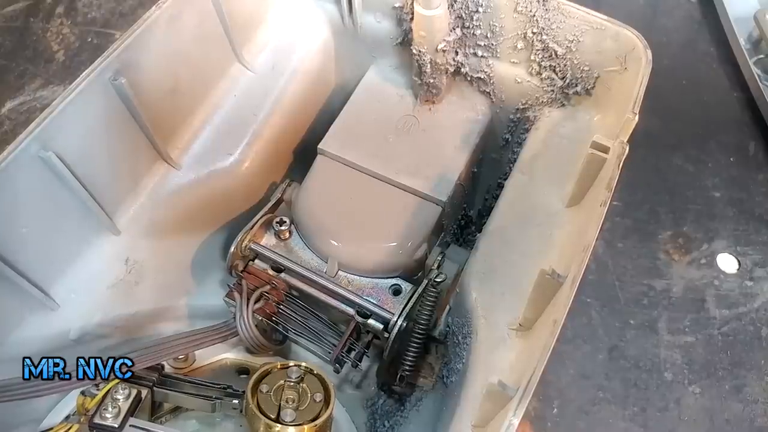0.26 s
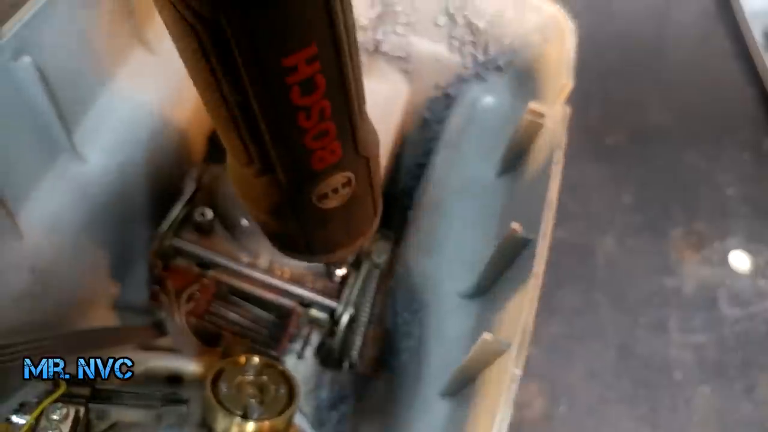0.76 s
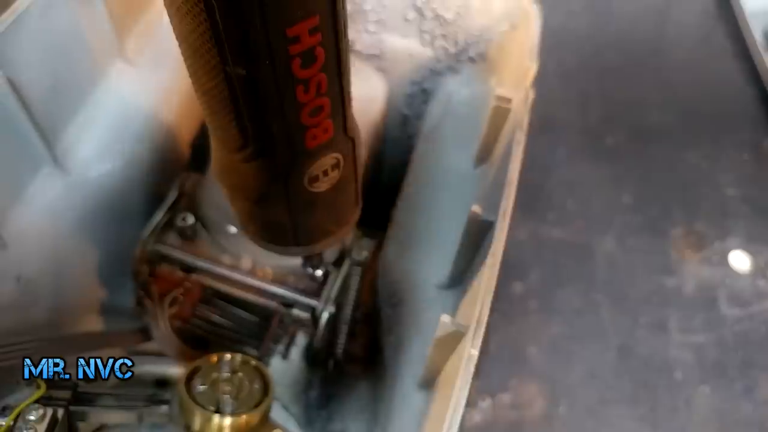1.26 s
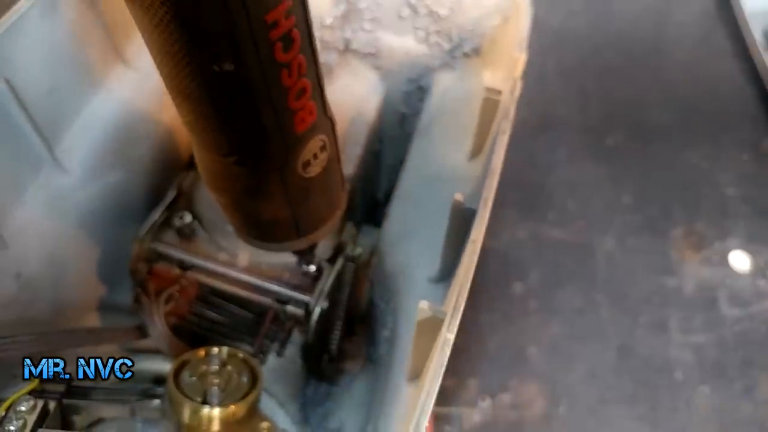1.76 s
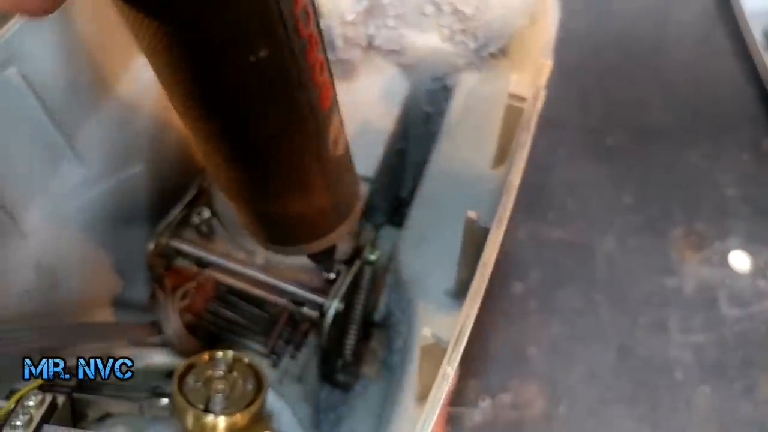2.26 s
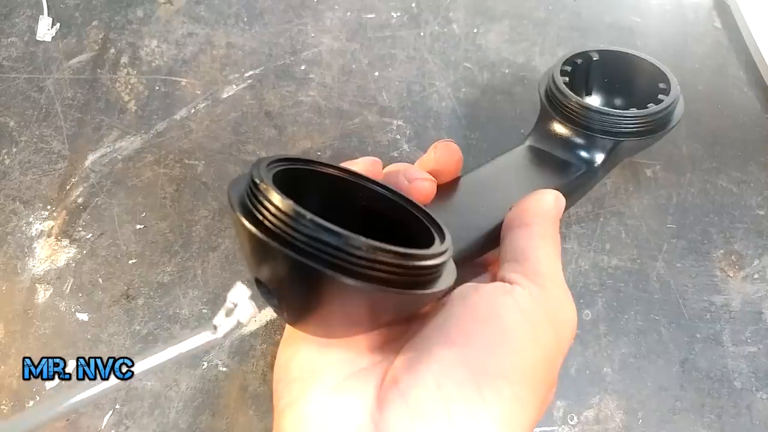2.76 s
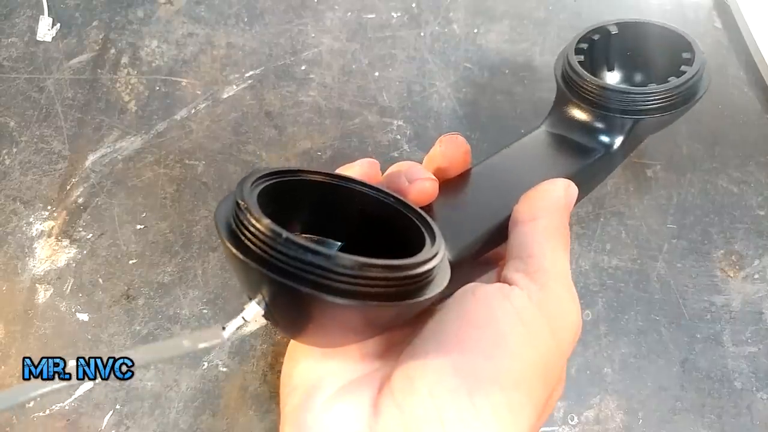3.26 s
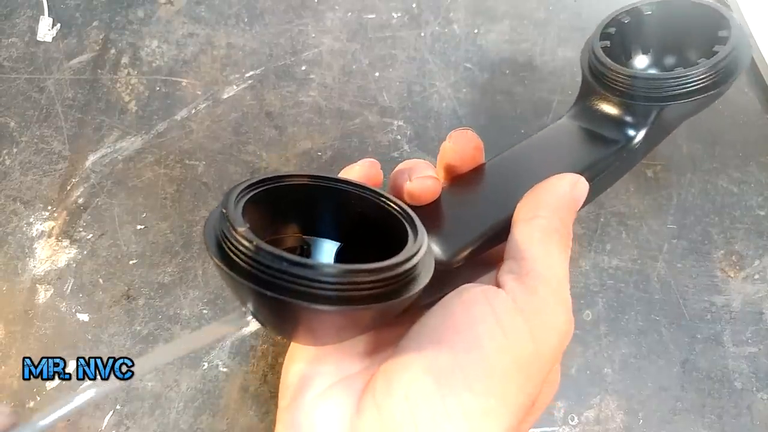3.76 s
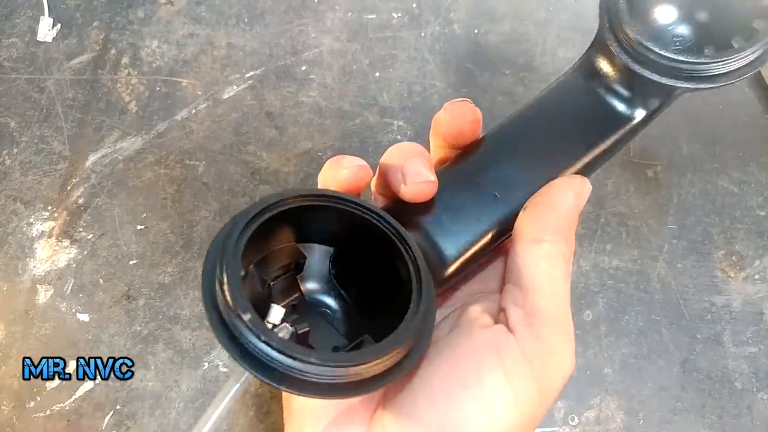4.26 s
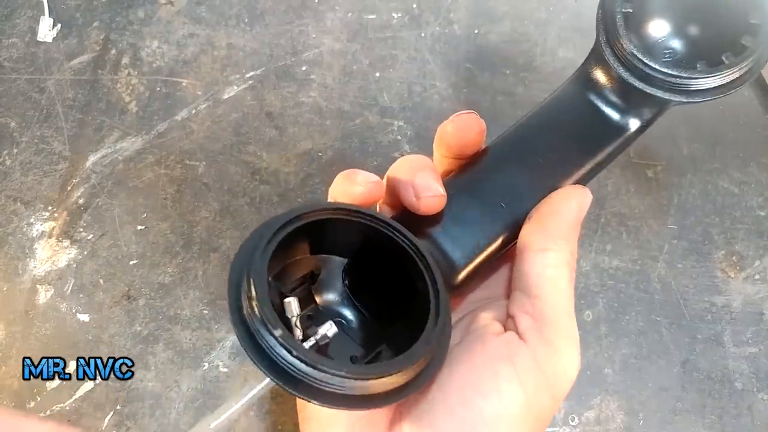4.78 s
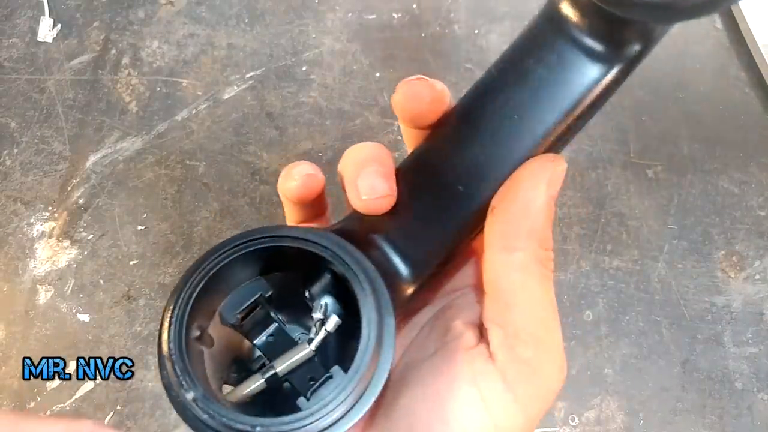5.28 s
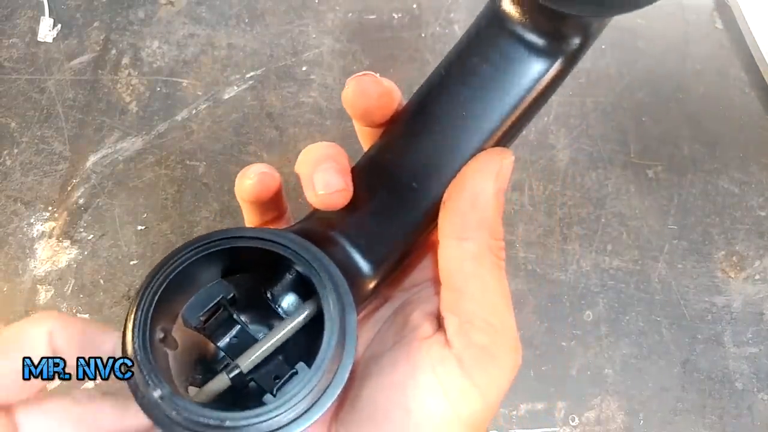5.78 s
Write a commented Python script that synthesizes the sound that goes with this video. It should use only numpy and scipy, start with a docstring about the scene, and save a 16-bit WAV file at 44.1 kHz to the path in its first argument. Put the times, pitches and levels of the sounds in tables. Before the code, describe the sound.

Light metallic taps, then a small cordless screwdriver clacks and whirs harshly for a second, stops with a click; afterwards small terminals tick in a plastic cup.

```python
"""Cordless screwdriver on an old telephone

A workbench in a small humming workshop, everything close to the microphone. The bit taps the screw head.
The motor spins up, the spindle lock clacks, the gears whir for a second and coast to a click.
Then a cord is drawn through the handset, its metal terminals ticking against the plastic cup.
Gears are sine tones; knocks, rattle and hiss are shaped noise through filters; an opening drone fades out.
"""
import sys
import numpy as np
from scipy import signal
from scipy.fft import rfft, irfft
from scipy.io import wavfile
from scipy.ndimage import uniform_filter1d

SR = 44100
rng = np.random.default_rng(int(sys.argv[2]) if len(sys.argv) > 2 else 0)


def generate_wav(signal):
    """Clip the signal to [-1, 1] and save it as 16-bit WAV at the path in sys.argv[1]."""
    frames = np.transpose(np.atleast_2d(signal))
    scaled = np.clip(frames, -1, 1) * 32767
    pcm = np.round(scaled).astype(np.int16)
    wavfile.write(sys.argv[1], SR, pcm)


N = 265923
T = np.arange(N) / SR  # s

# the trigger is pressed, let go, the shaft stands still (s)
START_S, RELEASE_S, STOP_S = 1.355, 2.3, 2.576
BRAKING_S = 2.38  # middle of the braking
ROOM_T60_S = 0.384


def screwdriver(flutter=0.0015):
    """Planet gears whine, their teeth rattle the housing, the brushes hiss; the room answers."""
    hz = shaft_rate()
    turns = np.cumsum(hz * (1 + flutter * walk(60))) / SR
    running = np.clip((STOP_S - T) / 0.01, 0, 1)
    full_speed = np.clip((hz / 300) ** 2, 0, 1)  # the whine only stands out near full speed

    whine = gear_whine(turns, hz) * full_speed
    whine = whine * loudness(-28.5, power=5, growth_db=4.5, fade_s=2.2, fade_db=44)

    rattle = tooth_rattle(turns) * loudness(-27.5, power=1.7, growth_db=2.5, fade_s=2.43, fade_db=190)
    rattle = rattle * undb(-7.5 * swell(2.325, 0.055))  # the teeth unload and rattle less

    hiss = brush_hiss() * loudness(-27, power=3, growth_db=5.3, fade_s=2.425, fade_db=240)
    hiss = hiss * undb(4 * swell(BRAKING_S, 0.05))  # the hiss swells under braking

    # the whine is kept drier, so its tones stay steady
    steady = room(running * whine, -17, ROOM_T60_S)
    return steady + room(running * (rattle + hiss), -9.5, ROOM_T60_S)


def shaft_rate():
    """Motor turns per second: spin-up, sag under load, a swing with each turn of the screw, then coasting."""
    full_hz, sag_hz_per_s, coast_hz_per_s = 325.23, 28, 300
    screw_hz, swing_hz, easy_s = 5.4, 2.4, 1.91  # the load eases once a turn; easy_s is one such moment
    swing = swing_hz * np.cos(2 * np.pi * screw_hz * (T - easy_s))
    driven = full_hz - sag_hz_per_s * (T - START_S) + swing
    coasting = coast_hz_per_s * np.maximum(T - RELEASE_S, 0)
    return np.maximum(spin_up() * driven - coasting, 0)


def spin_up(time_s=0.04):
    """Share of full speed reached since the trigger was pressed, an exponential approach."""
    return 1 - np.exp(-np.maximum(T - START_S, 0) / time_s)


def loudness(db, power, growth_db, fade_s, fade_db):
    """A voice rises with the motor, grows (dB/s) as the screw backs out, and from fade_s falls (dB/s)."""
    drift_db = growth_db * (T - START_S) - fade_db * np.maximum(T - fade_s, 0)
    return spin_up() ** power * undb(db + drift_db)


# gear whine: multiple of the shaft rate, level/dB; the third and sixth are by far the strongest
GEAR_TONES = [(1, -19), (3, 1.5), (4, -17), (5, -10), (6, 0.5), (7, -15), (7.5, -19), (8, -14), (9, -20),
              (10, -13.5), (12, -24)]
# sharp housing resonances that light up a mesh tone gliding through: f/Hz, width/Hz, level/dB
SINGING_MODES = [(920, 40, -9), (2200, 52, 7), (2740, 32, 15), (3025, 30, 2)]


def gear_whine(turns, hz, waver_db=1.71):
    """Mesh tones locked to the shaft, clean at speed and broken up when the teeth go slack."""
    slack = np.clip((300 - hz) / 30, 0, 1)  # 0 above 300 turns/s, 1 below 270
    out = 0
    for multiple, db in GEAR_TONES:
        phase = 2 * np.pi * (multiple * turns + rng.random())
        size = undb(db + waver_db * walk(24.92))
        stumble = slack * walk(170)
        broken = 1 + slack * walk(60)
        out = out + size * broken * np.sin(phase + stumble)
    return (out + ring(out, SINGING_MODES)) / (1 + slack)


# gearbox housing: f/Hz, width/Hz, level/dB
HOUSING_MODES = [(245, 25, -23.5), (756.4, 27.3, 0.5), (898.3, 104.2, 1), (1243, 219, -7.5),
                 (1623, 159, 4.5), (1890, 245, -7), (2268.6, 88.8, 4), (2450, 175, -46), (2850, 160, -31)]


def tooth_rattle(turns, repeat=0.4984, gate_depth=0.443):
    """Teeth knock the housing; the same flaws come round again every fourth turn."""
    flaws = rng.standard_normal(512)[(turns * 128).astype(int) % 512]  # 128 flaws a turn
    teeth = repeat * flaws + (1 - repeat) * rng.standard_normal(N)
    mesh = 1 + gate_depth * np.cos(2 * np.pi * 3 * turns)  # three swells in each turn
    uneven = undb(1.2 * walk(600))
    rattle = ring(teeth * mesh * uneven, HOUSING_MODES)
    # the upper housing resonance swells while the loosened screw runs freely
    rattle = rattle + swell(1.906, 0.22) * resonate(rattle, 2490, 586)
    body = [(240, 5.0), (450, -13), (640, -12), (730, 1), (2700, -1), (3600, -6), (10000, -20.5)]
    return unit(colour(rattle, body))


# brushes and sliding teeth: f/Hz, level/dB per Hz
BRUSH_COLOUR = [(300, -19.5), (1500, -12), (3000, -7), (3600, -6.5), (4400, -5), (5300, -2.5), (6400, -7.5),
                (7800, -1), (9200, -1), (10800, -0.5), (12000, -6), (13500, -15), (14200, -12.5),
                (16000, -19)]


def brush_hiss(grit_db=2, bright_share=0.377, brake_share=0.775, gather_s=0.13):
    """Gritty noise that gathers into a brighter hiss centred near 9.4 kHz as the motor brakes."""
    hiss = colour(rng.standard_normal(N) * undb(grit_db * walk(900)), BRUSH_COLOUR)
    braking = bright_share + brake_share * swell(BRAKING_S, gather_s)
    bright = resonate(resonate(rng.standard_normal(N), 9480, 2600), 9400, 2500)
    return (unit(hiss) + braking * unit(bright)) / np.hypot(1, braking)


# spindle lock: t/s, level/dB, rise/s, fall/s, tilt/dB per octave, strongest ring f/Hz,
# housing thud level/dB relative to the snap
LOCK_CLACKS = [(1.399, -25, 0.0018, 0.0032, 5.5, 8300, -11.5), (1.442, -17.5, 0.00033, 0.0025, 3, 5000, -1),
               (1.4438, -11, 0.00078, 0.00466, 2.5, 1720, -9),
               (1.46, -18.5, 0.00356, 0.0095, -0.5, 1600, -0.5),
               (2.5697, -30, 0.0003, 0.0087, 1, 8300, -2.5),
               (2.5789, -19, 0.000165, 0.00172, -2, 3390, -12)]
# steel of the lock: f/Hz, level/dB per Hz
LOCK_COLOUR = [(150, -4.5), (240, 8.5), (340, -13), (480, -4.5), (900, -3.5), (1700, 11.5), (2500, 3.5),
               (4200, 4.5), (5500, 6.5), (6600, -1.5), (8400, 9), (10500, -4), (16000, -28)]
# the driver's body and the bench under it: t/s, level/dB, f/Hz, width/Hz
BODY_THUMPS = [(1.446, -19, 254, 21.2), (1.446, -26, 486, 69.5), (1.446, -23, 762, 58.3),
               (2.484, -26, 757.2, 45), (2.578, -31, 887, 109.5)]


def spindle_lock(wet_db=-9):
    """Steel rollers snap in and out of their wedge, shake the housing and jolt the whole tool."""
    out = np.zeros(N)
    for s, db, rise, fall, tilt_db, hz, thud_db in LOCK_CLACKS:
        snap = colour(contact(rise, fall, tilt_db, wet_db), LOCK_COLOUR)
        add(out, s, snap + resonate(snap, hz, hz / 2), db)
        thud = ring(contact(rise, fall, 0, wet_db), HOUSING_MODES)
        add(out, s, thud, db + thud_db)
    for s, db, hz, width in BODY_THUMPS:
        jolt = resonate(signal.unit_impulse(SR // 4), hz, width)
        add(out, s, resonate(jolt, hz, hz / 2), db)
    return out


# the bit feels for the screw head: t/s, level/dB
BIT_TAPS = [(.660, -39.5), (.696, -38.5), (0.759, -38.5), (0.8642, -35.5)]
# the ringer's steel frame: f/Hz, width/Hz, level/dB
FRAME_MODES = [(737, 92, 13), (1610, 173, 14), (2360, 330, 7.5), (3140, 206, -4), (4360, 320, -16),
               (5440, 580, -3), (8500, 630, -24.5)]


def taps(crack_db=-19, wet_db=-10):
    """The bit taps the screw and rings the frame, with a little bare crack."""
    out = np.zeros(N)
    for s, db in BIT_TAPS:
        force = contact(0.000244, 0.00284, 0, wet_db)
        add(out, s, ring(force, FRAME_MODES) + undb(crack_db) * force, db)
    return out


# cord terminals against the cup: t/s, level/dB, skid before the knock/s, tilt/dB per octave,
# the terminal's own ring f/Hz
TERMINAL_TICKS = [(3.8924, -40.5, 0.00043, -3.5, 6340), (4.5209, -42.5, 0.00027, 3.5, 8400),
                  (4.539, -38, 0.003, 0, 8440), (4.552, -34, .0055, 1, 7850),
                  (4.584, -38.5, 0.002, 2, 8420), (4.646, -46, 0.00023, 2.5, 8680),
                  (5.0385, -26, 0.00458, 0, 5990), (5.16, -34.5, 0.00636, 2, 6000),
                  (5.2674, -27.5, 0.0002, 4, 4620), (5.8523, -24, 0.00016, 1.5, 8750),
                  (5.9165, -31, 0.00024, -1, 4720)]
# terminals and cup, heavily damped by the hand: f/Hz, level/dB per Hz
CUP_COLOUR = [(500, -18.5), (1300, -11), (2300, -3), (2900, -8), (3500, -1.5), (4200, -10), (4800, -3.5),
              (5900, 2), (6500, -4.5), (7300, 5), (8800, 5), (10500, 0), (12000, -15.5), (16000, -25)]
# the metal terminals on the cord's end: f/Hz, width/Hz, level/dB
TERMINAL_MODES = [(5400, 160, 4), (7650, 200, 0), (8400, 130, 3), (11200, 250, 5)]


def ticks(ring_db=1, ring_width=700, wet_db=-7.5, metal_db=-7, crack_db=-16, hard_db=-25):
    """Terminals knock and skid in the cup, each ringing briefly; the harder the knock, the more bare crack."""
    fall_s, skid_linger = 0.00241, 0.49  # a knock dies away this fast, plus a share of its skid
    out = np.zeros(N)
    for s, db, skid, tilt_db, hz in TERMINAL_TICKS:
        knock = colour(contact(skid, fall_s + skid_linger * skid, tilt_db, wet_db), CUP_COLOUR)
        own_ring = undb(ring_db) * resonate(knock, hz, ring_width)
        metal = undb(metal_db) * ring(knock, TERMINAL_MODES)
        add(out, s, knock + own_ring + metal, db)
        crack = contact(skid, fall_s / 2, 0, 2 * wet_db)
        add(out, s, crack, db + crack_db + (db - hard_db))
    return out


# pulls on the cord, which rubs along the cup: middle t/s, half length/s, level/dB, catches per s (wavering)
CORD_PULLS = [(3.085, 0.04, -60, 69.5), (3.683, 0.109, -60, 44.4), (4.586, 0.0475, -46.5, 900)]


def cord(metal_db=-3):
    """The cord catches and slips on the cup: faint single ticks when slow, a jingling rasp when pulled fast."""
    fall_s, scatter_db, tilt_db = 0.00068, 1, 3  # each catch: decay, spread of level, tilt per octave
    out = np.zeros(N)
    for s, half, db, rate in CORD_PULLS:
        caught = np.cumsum(rate * undb(4 * walk(50))) / SR + rng.random()
        slips = np.diff(np.floor(caught), prepend=0) > 0
        strengths = slips * undb(scatter_db * rng.standard_normal(N))
        grip = signal.lfilter([1], [1, -np.exp(-1 / (fall_s * SR))], strengths)
        out += unit(grip) * swell(s, half) * undb(db)
    brighter = [(hz, db + tilt_db * np.log2(hz)) for hz, db in CUP_COLOUR]
    rasp = out * unit(colour(rng.standard_normal(N), brighter))
    return rasp + undb(metal_db) * ring(rasp, TERMINAL_MODES)


# workshop air: f/Hz, level/dB per Hz
AIR_COLOUR = [(20, -16), (110, 0.5), (200, 4.5), (330, 0.5), (600, -2), (1000, -4), (1700, -8), (2300, -13),
              (4000, -18), (6500, -21.5), (8700, -17.5), (10500, -27), (13000, -29), (16000, -30)]
# low room resonances: f/Hz, width/Hz, level/dB rms
ROOM_RUMBLE = [(44.63, 4.45, -46), (54.54, 8.54, -41), (74.06, 17.2, -48), (140.54, 13.8, -52.5)]
# mains hum: f/Hz, level/dB rms before the waver
MAINS_HUM = [(100, -42.5), (200, -58)]
# background hiss of the opening: f/Hz, width/Hz, level/dB rms before the fade
OPENING_HISS = [(441, 800, -49), (2350, 720, -59.5), (5286, 450, -59.5), (7690, 3470, -58)]
# low hum tones of the opening: f/Hz, level/dB rms before the waver and fade
OPENING_HUM = [(68, -43.5), (143, -45.5), (173, -43.5)]


def workshop():
    """Filtered-noise air, low rumble, mains hum, and an opening drone that fades out."""
    air = unit(colour(rng.standard_normal(N), AIR_COLOUR)) * undb(-45 + 0.5 * walk(6.2))
    fade = np.clip((0.742 - T) / 0.317, 0, 1)  # silent from 0.742 s
    drone = (narrow_noises(OPENING_HISS) + tones(OPENING_HUM)) * fade
    return air + narrow_noises(ROOM_RUMBLE) + tones(MAINS_HUM) + drone


def narrow_noises(rows):
    """Noise held in (Hz, width, dB) resonances; the narrower, the more like a wavering tone."""
    out = 0
    for hz, width, db in rows:
        held = resonate(resonate(rng.standard_normal(N), hz, width), hz, width)
        out = out + undb(db) * unit(held)
    return out


def tones(rows, waver_db=2.6):
    """Steady (Hz, dB rms) hum lines that waver a little in level."""
    out = 0
    for hz, db in rows:
        size = np.sqrt(2) * undb(db + waver_db * walk(4.4))
        out = out + size * np.sin(2 * np.pi * (hz * T + rng.random()))
    return out


def room(x, wet_db, t60, gap_s=0.0019):
    """Bench and near walls answer with a short dense tail of decaying noise."""
    t = T[:SR // 2]
    decay = np.exp(-np.log(1000) * t / t60)
    tail = rng.standard_normal(len(t)) * decay * np.clip(t / gap_s - 1, 0, 1)
    tail = tail / np.sqrt(np.sum(tail ** 2))
    tail = colour(tail, [(200, 6), (2000, 2.0), (9000, -0.5), (15000, -16)])
    return x + undb(wet_db) * signal.fftconvolve(x, tail)[:N]


def contact(rise, fall, tilt_db, wet_db, wash_t60_s=0.2555):
    """A rough contact: noise that builds and dies away, trailing a diffuse room wash, tilted above 1 kHz."""
    t = T[:SR // 3]
    blow = np.minimum(t / rise, 1) ** 2 * np.exp(-np.maximum(t - rise, 0) / fall)
    wash = np.clip((t - rise) / 0.0041, 0, 1) * np.exp(-np.log(1000) * t / wash_t60_s)
    shape = np.hypot(unit(blow), undb(wet_db) * unit(wash))
    # four octaves from 1 to 16 kHz
    return colour(shape * rng.standard_normal(len(t)), [(1000, 0), (16000, 4 * tilt_db)])


def add(track, s, sound, db):
    """Place a blow at time s; db is its energy spread over 10 ms."""
    start = int(s * SR)
    gain = undb(db) * np.sqrt(SR / 100 / np.sum(sound ** 2))
    part = (sound * gain)[:N - start]
    track[start:start + len(part)] += part


def resonate(x, hz, width):
    """One resonance, gain 1 at its centre."""
    return signal.lfilter(*signal.iirpeak(hz, hz / width, fs=SR), x)


def ring(x, modes):
    """A body made of parallel (Hz, width, dB) resonances."""
    return sum(undb(db) * resonate(x, hz, width) for hz, width, db in modes)


def colour(x, points):
    """Causal minimum-phase filter through (Hz, dB) points."""
    hz, db = np.transpose(points)
    grid = np.fft.rfftfreq(4096, 1 / SR) + 1  # 1 Hz up, so the log stays finite
    cepstrum = irfft(np.log(undb(np.interp(np.log(grid), np.log(hz), db))))
    # fold the cepstrum onto positive time
    cepstrum[1:len(grid) - 1] *= 2
    cepstrum[len(grid):] = 0
    response = irfft(np.exp(rfft(cepstrum)))
    return signal.fftconvolve(x, response)[:len(x)]


def walk(rate):
    """Slow chance: random levels, rate per second, joined smoothly, spread near 1."""
    size = int(SR / rate)
    levels = np.repeat(rng.standard_normal(N // size + 1), size)
    return 1.2 * uniform_filter1d(levels, size)[:N]


def swell(middle, half):
    """A smooth rise to 1 and fall, around a moment (s)."""
    return np.exp(-((T - middle) / half) ** 2)


def undb(db):
    """Decibels to gain."""
    return 10 ** (np.asarray(db) / 20)


def unit(x):
    """Scale to rms 1."""
    return x / np.sqrt(np.mean(x ** 2))


def scene():
    """Tool and handset on the bench, in the workshop."""
    tool = screwdriver() + spindle_lock() + taps()
    handset = ticks() + cord()
    return (tool + handset + workshop())[None]


def record(dry):
    """The microphone drops the deepest bass, clips at full scale and cuts the top above 15.9 kHz."""
    bass_cut = signal.butter(4, 36, "high", fs=SR, output="sos")
    top_cut = signal.ellip(10, 0.2, 80, 15900, fs=SR, output="sos")
    x = np.clip(signal.sosfilt(bass_cut, dry), -1, 1)
    return signal.sosfilt(top_cut, x)


dry = scene()
out = record(dry)
generate_wav(out)
```